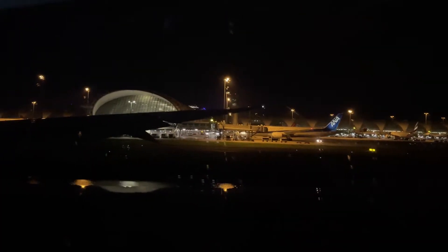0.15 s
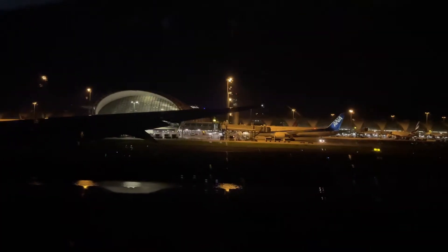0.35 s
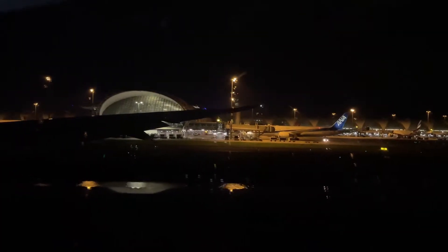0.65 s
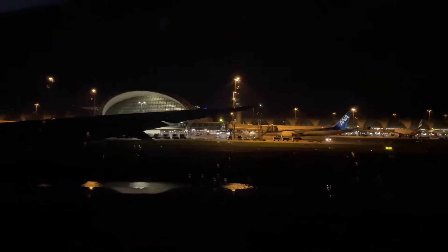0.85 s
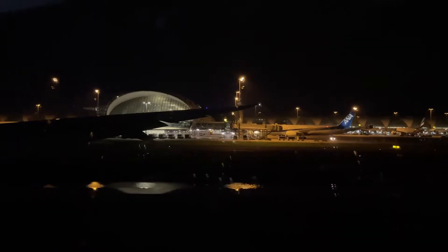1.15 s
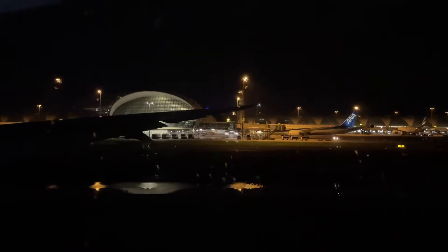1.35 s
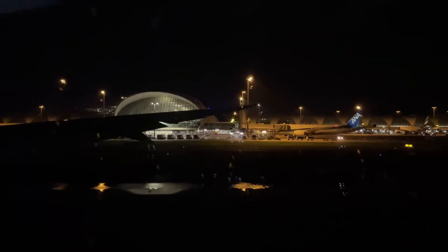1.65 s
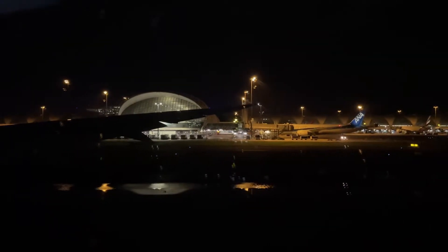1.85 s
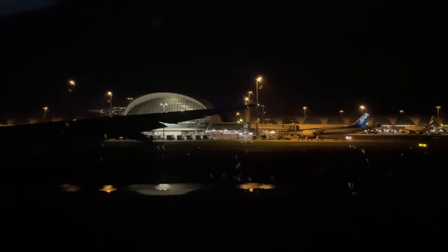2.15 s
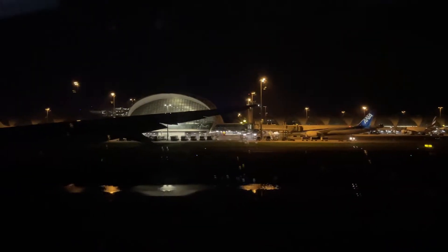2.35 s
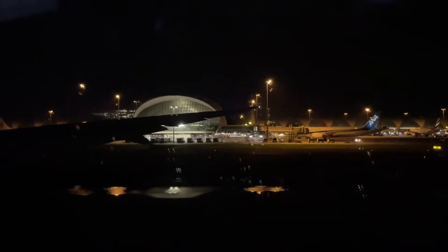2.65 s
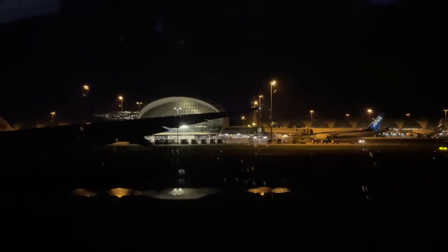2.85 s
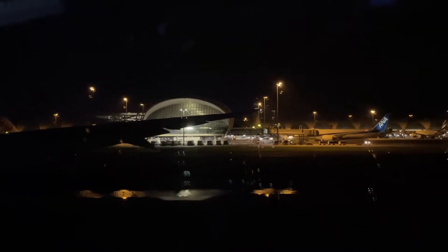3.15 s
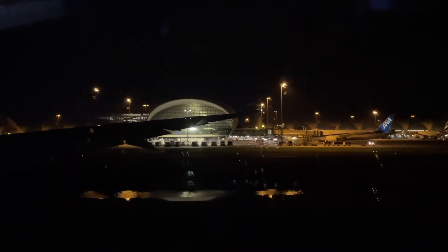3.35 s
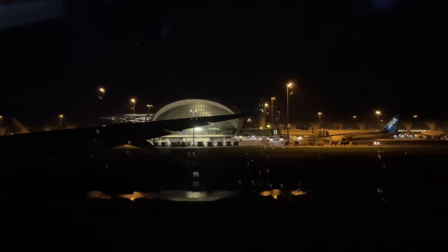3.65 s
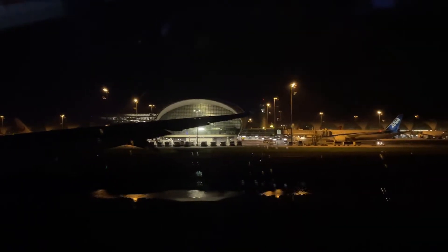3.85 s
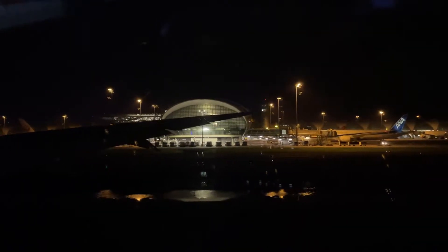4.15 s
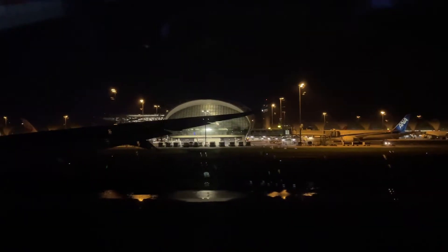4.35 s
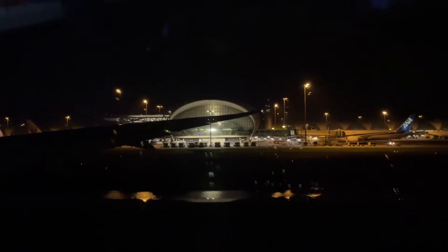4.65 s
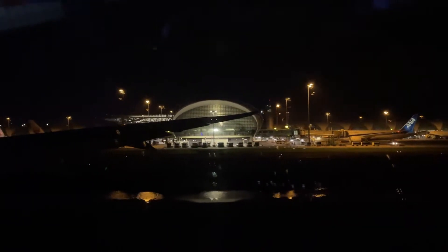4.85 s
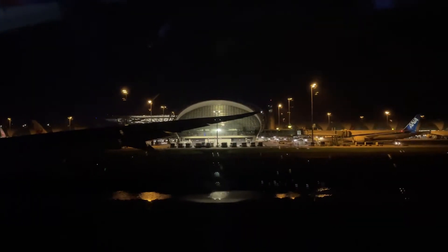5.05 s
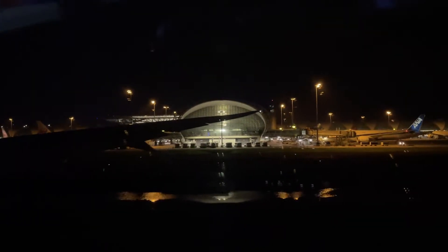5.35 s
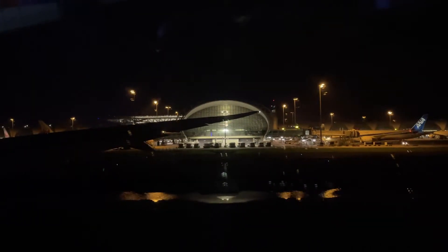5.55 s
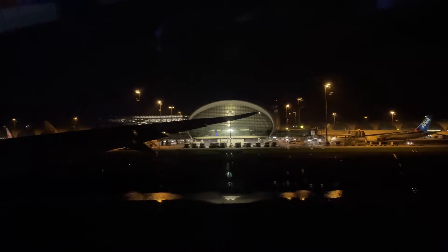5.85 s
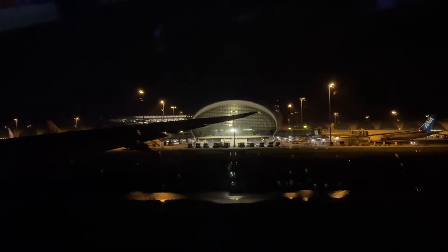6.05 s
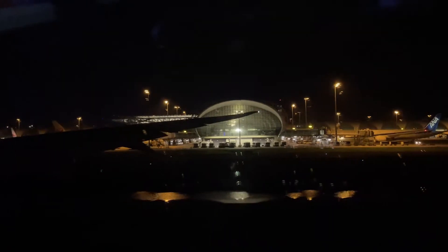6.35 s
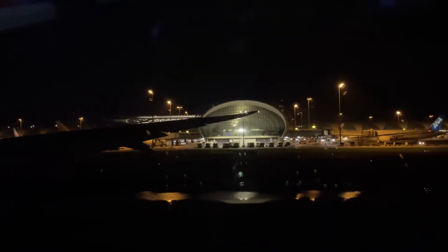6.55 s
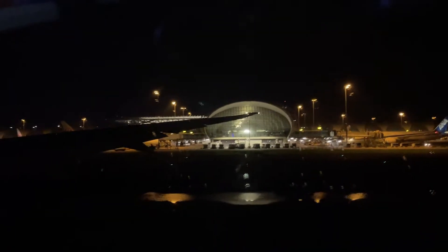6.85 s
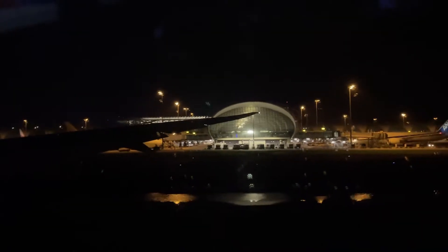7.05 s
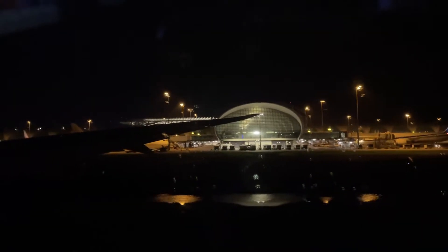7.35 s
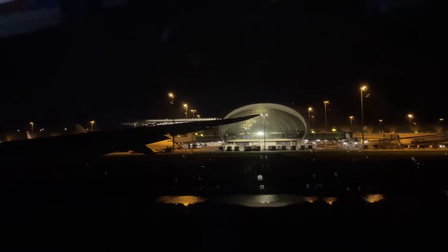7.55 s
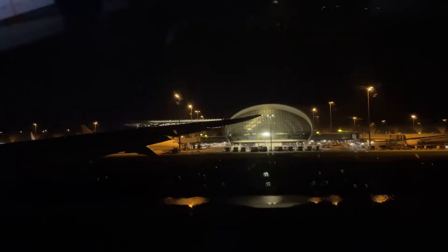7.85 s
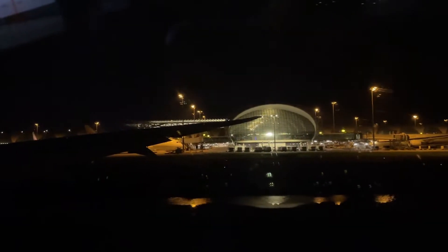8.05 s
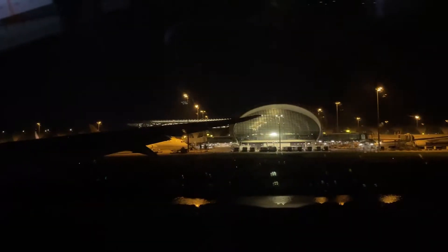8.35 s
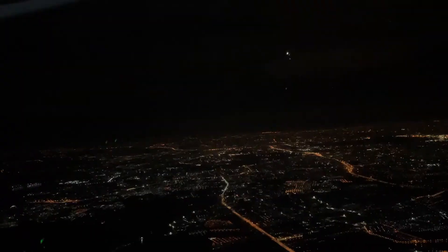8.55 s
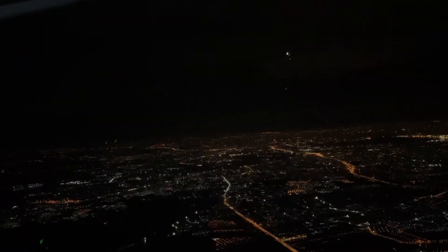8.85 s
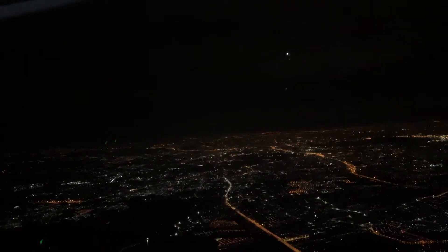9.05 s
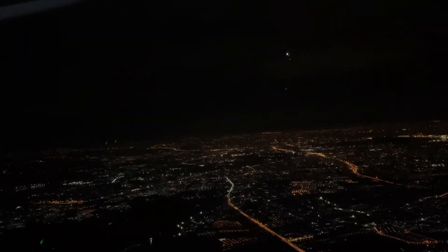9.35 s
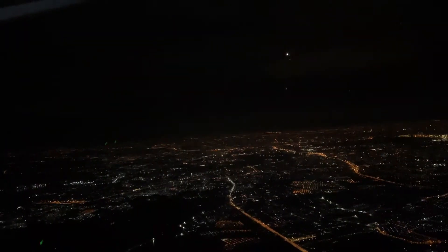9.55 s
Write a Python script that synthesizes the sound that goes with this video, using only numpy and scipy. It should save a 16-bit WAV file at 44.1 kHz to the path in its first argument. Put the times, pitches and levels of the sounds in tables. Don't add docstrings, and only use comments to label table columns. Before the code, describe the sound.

A close stereo microphone at a jet's window seat hears the cabin from inside. From 0 to about 8.4 seconds the aircraft taxis: a low, muffled engine hum and fuselage drone slowly swell and ease, while wheels rumble and bump softly over slab joints, quickly at first in the opening second, then more irregularly. Soft vent hiss and a very thin electrical whine lie underneath. Around 6.5 to 7.4 seconds the jolts crowd together and loose trim ticks, knocks and squeaks, clearest near 6.95. A faint high vent whistle rises around 7.75. At about 8.4 seconds the sound switches at once to the climb: a much louder, deep jet roar booms in the wall, dipping near 9.05, swelling again, dipping briefly near 9.55 and surging near 9.7, with faint beating engine tones and rough-air shakes.

```python
import sys
import numpy as np
from scipy import signal
from scipy.fft import rfft, irfft, next_fast_len
from scipy.io import wavfile
from scipy.ndimage import uniform_filter1d

SR = 44100
rng = np.random.default_rng(int(sys.argv[2]) if len(sys.argv) > 2 else 0)


def magnitude_from_level(level_db):
    exponent = np.asarray(level_db, float) / 20
    return 10 ** exponent


def store_pcm(level_fs):
    pcm = np.round(np.clip(level_fs, -1, 1) * 32767).astype(np.int16)
    wavfile.write(sys.argv[1], SR, np.atleast_2d(pcm).T)


N = 427329
CHANGE_S = 8.41432

# f/Hz, sum of ports/dB per Hz, difference/dB per Hz, in-phase link, quarter-cycle link
AIR_HISS = [(4040, -99.3, -100.4, -0.11, 0.35), (4800, -99.3, -103.1, -0.06, 0.11),
            (5980, -97.5, -97.5, 0.05, -0.09), (6470, -104.7, -100.8, 0.0, -0.22),
            (7450, -117.0, -104.7, -0.02, 0.32), (8240, -113.7, -106.1, 0.02, 0.5),
            (9550, -111.7, -112.3, 0.01, 0.66), (10200, -112.3, -122.1, 0.02, 0.29),
            (11100, -117.0, -140.0, -0.01, -0.02), (12300, -118.4, -125.0, 0.0, -0.18),
            (13000, -121.0, -119.4, -0.02, -0.5), (14000, -140.0, -116.9, -0.01, -0.38),
            (15600, -135.9, -117.0, 0.03, 0.19), (16200, -140.0, -140.0, -0.01, -0.01)]


def taxi(t, whine):
    # f/Hz, sum/dB per Hz, difference/dB per Hz, in-phase link, quarter-cycle link
    rumble = [(15, -81.5, -86, 0.04, -0.07), (29.6, -54.5, -84, 0.65, -0.24), (45, -57, -87, 0.55, -0.03),
              (61, -52, -76, 0.03, 0.12), (95.4, -61.5, -87, -0.02, 0.47), (115, -55, -76, -0.19, 0.75),
              (144, -57.5, -69, -0.08, 0.69), (164, -61.5, -80, -0.26, 0.33),
              (206.6, -56.5, -64.5, 0.36, 0.8), (261, -57.5, -66, -0.06, 0.8),
              (299, -58, -66.5, -0.72, 0.34), (343, -62.5, -72, -0.3, 0.73), (357, -65, -74, -0.38, 0.5),
              (419, -73, -71.5, -0.17, -0.16)]
    vents = [(460, -73.8, -72.6, 0.36, 0.23), (500, -72.3, -71.6, 0.69, 0.36),
             (570, -79.3, -79.2, 0.56, 0.12), (680, -77.0, -79.7, 0.45, 0.39),
             (800, -81.9, -83.8, 0.16, 0.09), (1050, -86.1, -84.2, 0.07, -0.05),
             (1220, -81.5, -86.5, 0.01, 0.08), (1450, -84.7, -87.3, -0.07, -0.03),
             (1650, -82.6, -86.7, -0.11, 0.08), (1800, -88.2, -89.2, -0.65, 0.04),
             (2000, -87.8, -91.3, 0.03, -0.13), (2400, -92.3, -97.6, -0.12, 0.25),
             (3000, -94.0, -97.1, -0.05, 0.37), (3400, -96.8, -98.4, 0.03, 0.29)]
    # f/Hz, sum/dB, difference/dB, difference leads/rad, beats/Hz, a loudest moment t/s
    idle_tones = [(133, -40.5, -58.5, 1.9, .205, 3.5), (204.5, -44, -59, 1.), (320.7, -43.8, -49, 2.6),
                  (902, -88, -72, .1, .3, 2)]
    steady_db = [-41., -39, -36, -34., -48, -53, -61]
    boom_beat_db = 1.7

    idle = engine_tones(idle_tones, t, waver=.003, flutter_db=1.3, far=.55)
    levels_db = np.array(steady_db)[:, None] + jolts(t)
    beats_per_s, loudest_s = idle_tones[0][-2:]
    levels_db[2] += boom_beat_db * np.cos(2 * np.pi * beats_per_s * (t - loudest_s))
    return cabin(t, rumble + vents + AIR_HISS, idle + whine, levels_db)


def climb(t, whine):
    # f/Hz, sum/dB per Hz, difference/dB per Hz, in-phase link, quarter-cycle link
    roar = [(15, -74.1, -88, 0.23, -0.02), (30, -62, -80.5, 0.75, -0.22), (55, -47.5, -69, 0.36, -0.41),
            (85.5, -44, -58, 0.22, 0.05), (116.6, -39.5, -54, 0.19, 0.19), (145, -38.5, -56.5, 0.54, -0.15),
            (176.3, -47, -61.5, 0.59, -0.18), (213, -52.5, -62, 0.0, 0.12), (261, -55.5, -63, -0.15, 0.41),
            (318, -59, -68, -0.36, 0.25), (406, -66.5, -72, -0.0, 0.18), (470, -73, -74, 0.24, 0.3),
            (595, -76.5, -74, 0.54, 0.25), (773, -80, -82, 0.21, 0.21)]
    vents = [(950, -85.5, -84, 0.06, 0.12), (1190, -86, -88.5, -0.05, 0.21),
             (1450, -88.5, -89, -0.09, -0.09), (1620, -87, -88.5, -0.05, -0.03),
             (1770, -93, -93.5, -0.39, -0.02), (1980, -91, -94.5, -0.22, -0.17),
             (2350, -98, -99, -0.09, 0.27), (3000, -92.5, -94.5, -0.05, 0.3),
             (3400, -96.5, -99.7, -0.05, 0.3)]
    # f/Hz, sum/dB, difference/dB, difference leads/rad, beats/Hz, a loudest moment t/s
    thrust_tones = [(38.6, -37, -75, -.1), (705.5, -62.5, -65.5, 1.5, 2.5, 8.98),
                    (855.5, -63.5, -61.5, 1., 1.65, 8.66), (1136, -72, -89, 2.2, 1.2, 9),
                    (1418, -76, -74, -2.1, 1.4, 8.9), (2799, -82, -100, 3., 1.3, 9.1),
                    (5895, -86, -100, -.4, 1.1, 9.2)]
    steady_db = [-37.5, -33.5, -21.5, -30.5, -44, -52, -62]
    # t/s, level about its mean/dB
    swells = [
        (8.42, 0),
        (8.54, 1.5),
        (8.85, 0.3),
        (9.05, -3),
        (9.18, 1),
        (9.44, 1.5),
        (9.56, -2.5),
        (9.69, 2.5),
    ]
    swell_share = [-0.085, -0.093, 1, -0.28, .1, 0.23, .01]

    thrust = engine_tones(thrust_tones, t, waver=.002, flutter_db=.7, far=.6)
    levels_db = np.array(steady_db)[:, None] + jolts(t)
    levels_db = levels_db + np.outer(swell_share, curve(swells, t))
    return cabin(t, roar + vents + AIR_HISS, thrust + whine, levels_db)


def cabin(t, noise_rows, tonal, levels_db):
    edges_hz = [0, 50, 95, 180, 380, 800, 2500, 30000]
    gust_depth_db = [0.12, 0, 0, 0, 0.27, .53, 0.58]
    hold_s = [.25, .18, .18, 0.18, .18, .22, .19]

    size, step = next_fast_len(len(t)), 64
    spectrum = noise_field(noise_rows, size) + rfft(tonal, size)
    hz = np.fft.rfftfreq(size, 1 / SR)
    gusts = wander(t, 24.)[::step]
    out = np.zeros((2, len(t)))
    for lo, hi, level_db, gust_db, hold in zip(edges_hz, edges_hz[1:], levels_db, gust_depth_db, hold_s):
        layer = irfft(spectrum * ((hz >= lo) & (hz < hi)), size)[:, :len(t)]
        power = uniform_filter1d(layer[0] ** 2, step)[::step]
        for _ in range(2):
            power = uniform_filter1d(power, max(int(hold * SR / step), 2))
        wanted = magnitude_from_level(level_db[::step] + gust_db * gusts)
        gain = wanted / np.sqrt(abs(power) + 1e-14)
        out += layer * np.interp(t, t[::step], gain)
    return out


def noise_field(rows, size):
    # f/Hz, width/Hz, sum/dB, difference/dB
    modes = [(64.3, 7.4, 2.5, 1), (81, 14, 2, 0), (152, 13, -0.5, -0.5), (210, 5.7, 5, 1.5),
             (250.5, 17, 2.5, -0.5), (272, 7.4, 3.5, -0.5), (303, 4.6, 3.5, 5), (394, 9, 5, 0.5),
             (1285, 31, 2, 2), (1698, 28, 4.5, 3), (1970, 60, 1, 2), (3280, 250, 1, 0), (4120, 60, -0.5, 2),
             (5430, 95, 1.5, -3), (13650, 200, 14.5, 1), (15400, 150, 7, 1.5), (1234, 28, 1, 0),
             (1680, 31, -1.5, -0.5)]

    hz = np.fft.rfftfreq(size, 1 / SR)
    f, *columns = np.transpose(rows)
    sum_db, diff_db, inphase, quarter = (np.interp(np.log(hz + 1), np.log(f + 1), c) for c in columns)
    for centre, width, lift_sum_db, lift_diff_db in modes:
        bump = np.exp(-((hz - centre) / width) ** 2)
        sum_db = sum_db + lift_sum_db * bump
        diff_db = diff_db + lift_diff_db * bump
    link = inphase + 1j * quarter
    link /= np.maximum(abs(link) / .98, 1)
    a, b, c, d = rng.standard_normal((len(hz), 4)).T
    shared = a + 1j * b
    diff = link * shared + np.sqrt(1 - abs(link) ** 2) * (c + 1j * d)
    per_bin = np.sqrt(size * SR) / 2
    level = per_bin * magnitude_from_level(np.maximum([sum_db, diff_db], -127))
    return level * [shared, diff] * (hz > 8) * (hz < 15800)


def engine_tones(rows, t, waver, flutter_db, far=0):
    out = np.zeros((2, len(t)))
    for hz, sum_db, diff_db, lead, *beat in rows:
        pitch = hz * (1 + waver * wander(t, 8.))
        phase = 2 * np.pi * (np.cumsum(pitch) / SR + rng.random())
        level = np.sqrt(2) * magnitude_from_level(flutter_db * wander(t, 4.5))
        if beat:
            beats_per_s, loudest_s = beat
            level = level * (1 + far * np.cos(2 * np.pi * beats_per_s * (t - loudest_s)))
        out += level * magnitude_from_level([[sum_db], [diff_db]]) * np.cos([phase, phase + lead])
    return out


def jolts(t):
    # t/s, rumble lift/dB, half length/s, cabin shake/dB
    hits = [(.13, 1.5, 0.058, 0.1), (.38, 3.5, .07, -0.3), (0.626, 3.5, 0.069, 0.3), (.88, 7.5, 0.055, 0),
            (1.128, 3.5, 0.11, 1.3), (1.85, 6, 0.31, 0.2), (2.32, 3.5, 0.15, 0.6), (2.9, 6, .14, 0.3),
            (3.135, 3.5, .08, -0.6), (3.64, 6.5, 0.056, 0.2), (4.306, 4.5, 0.1, .1), (4.903, 4, .08, -0.4),
            (5.3, 4, 0.27, 0.4), (5.715, 5, .13, -0.1), (6.15, 4.5, 0.083, 0.4), (6.6, 7, 0.096, 1.5),
            (6.763, 9, 0.077, 1), (6.97, 8.5, 0.099, 2), (7.164, 5, .11, 2.5), (7.436, 7.5, 0.091, 0.2),
            (7.85, 4.5, 0.17, 0.3), (8.27, 4.5, 0.16, .3), (8.75, 4.5, 0.16, 1), (9.052, 5.5, 0.12, 0.9),
            (9.517, 6, .11, 1.5)]
    lift_share = [.4, 1.11, -0.11, 0.055, -0.082, -0.013, -0.041]
    shake_share = [2.1, .01, 0.37, 0.71, 1.2, 1.05, 0.76]

    coarse = t[::64]
    s, lift_db, half_s, shake_db = np.transpose(hits)[:, :, None]
    bell = np.exp(-((coarse - s) / np.maximum(half_s, .03)) ** 2)
    lift = np.interp(t, coarse, (lift_db * bell).sum(0))
    shake = np.interp(t, coarse, (shake_db * bell).sum(0))
    return np.outer(lift_share, lift) + np.outer(shake_share, shake)


def trim_ticks():
    # t/s, level/dB, f/Hz, width/Hz, length/s, left-right lean (-1..1)
    events = [(1.125, -84, 11300, 4000, .02, .6), (6.945, -38, 1400, 1300, 0.034, .3),
              (7.05, -45, 1500, 1200, .08, .3), (7.12, -44, 1800, 900, .08, .3),
              (7.073, -61, 11000, 7000, .02, .6), (6.95, -61, 9500, 4000, .04, .3),
              (6, -49, 1200, 970, .05, .3), (7.16, -66.5, 12600, 300, .06, .6),
              (7.227, -55, 7700, 600, .02, -.9), (7.35, -71, 12800, 200, .06, .6),
              (7.445, -69, 12800, 200, .06, .6), (7.3, -73, 12800, 200, .05, .6),
              (6.52, -52, 900, 900, .08, .3), (7.2, -42, 820, 450, .09, .3),
              (8.7385, -52, 12000, 8000, .015, -.8)]

    out = np.zeros((2, N))
    t = np.arange(4000) / SR
    hz_axis = np.fft.rfftfreq(len(t), 1 / SR)
    for s, db, hz, width, length, lean in events:
        burst = rng.standard_normal(len(t)) * np.exp(-3 * t / length) * np.minimum(t / .001, 1)
        band = np.exp(-((hz_axis - hz) / width) ** 2)
        ring = irfft(rfft(burst) * band, len(t))
        at = round(s * SR)
        out[:, at:at + len(t)] += magnitude_from_level(db) * ring / abs(ring).max() * np.array([[1 + lean], [1 - lean]])
    return out


def vent_whistle(t):
    # t/s, level/dB
    swells = [
        (0, -82),
        (.6, -84),
        (1.3, -88),
        (2, -99),
        (7.4, -95),
        (7.75, -78),
        (8.2, -83),
        (8.41, -85),
        (8.42, -110),
    ]
    centre_hz, width_hz = 9000, 350

    hz = np.fft.rfftfreq(N, 1 / SR)
    band = rfft(rng.standard_normal(N)) * np.exp(-((hz - centre_hz) / width_hz) ** 2)
    pair = irfft([band, 1j * band], N)
    return pair / pair[0].std() * magnitude_from_level(curve(swells, t))


def electrical_whine(t):
    # f/Hz, sum/dB, difference/dB, difference leads/rad
    partials = [(2358.3, -77.1, -89.3, 2.4), (4716.3, -86.0, -86.4, -1.6), (7074.7, -101.1, -81.9, -0.4),
                (7223.4, -101.4, -92.0, -1.0), (8124.7, -99.2, -90.6, 1.4), (9231.8, -99.9, -98.9, 1.5),
                (10254.1, -98.2, -109.3, 1.6), (10611.1, -99.1, -131.8, 1.7),
                (11202.9, -101.6, -131.3, 2.3), (11793.7, -96.4, -110.5, -1.5),
                (12334.1, -103.1, -112.3, -1.6), (12580.9, -102.1, -103.3, -1.6),
                (12774.0, -103.9, -102.9, -1.6), (12973.4, -102.3, -100.0, -1.6),
                (13512.5, -113.1, -102.0, -1.6), (13760.2, -109.4, -95.0, -1.7),
                (13906.5, -131.3, -99.0, -3.1), (14153.3, -132.0, -96.5, 1.7),
                (14692.9, -125.8, -90.8, 2.6), (15332.1, -109.4, -90.8, 1.3)]
    return engine_tones(partials, t, waver=.0002, flutter_db=1.6)


def wander(t, rate_hz):
    f = np.geomspace(rate_hz / 20, rate_hz, 16)[:, None]
    coarse = t[::64]
    sines = np.sin(2 * np.pi * (f * coarse + rng.random(f.shape)))
    x = (sines / np.sqrt(f)).sum(0)
    return np.interp(t, coarse, x / x.std())


def curve(rows, t):
    s, db = np.transpose(rows)
    return np.interp(t, s, db)


def scene():
    t, change = np.arange(N) / SR, round(CHANGE_S * SR)
    whine = electrical_whine(t) + vent_whistle(t)
    ground = taxi(t[:change], whine[:, :change])
    air = climb(t[change:], whine[:, change:])
    jump, settle_s = 0.066, 0.0026
    gap = ground[:, -1:] - air[:, :1] + [[jump], [0]]
    air = air + gap * np.exp(-((t[change:] - t[change]) / settle_s) ** 2)
    both, diff = np.hstack([ground, air])
    return np.array([both + diff, both - diff]) + trim_ticks()


def low_pass(x):
    return signal.sosfilt(signal.butter(12, 15750, fs=SR, output="sos"), x)


def record(dry):
    ceiling = 0.41
    rounded = ceiling * np.tanh(dry / ceiling)
    return low_pass(rounded)


dry = scene()
out = record(dry)
store_pcm(out)
```